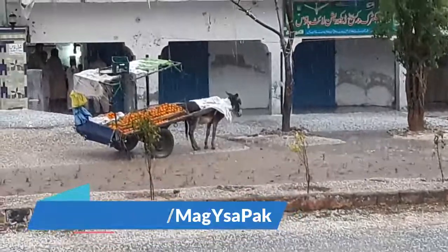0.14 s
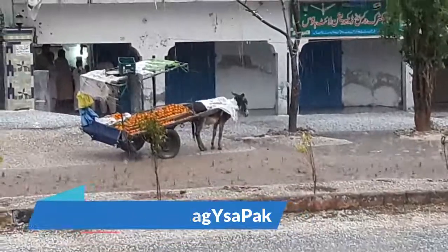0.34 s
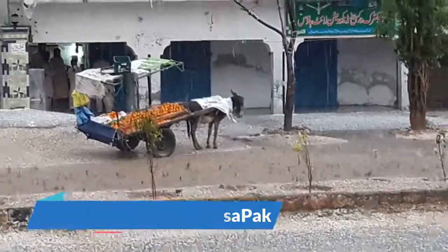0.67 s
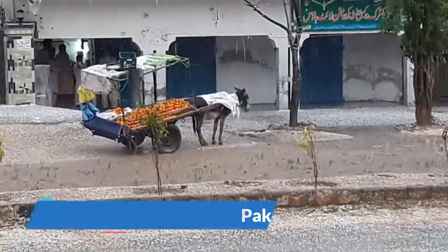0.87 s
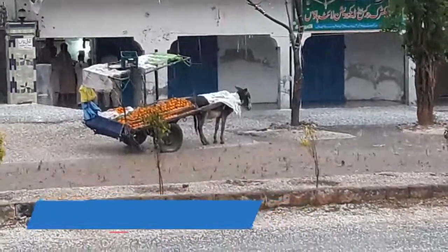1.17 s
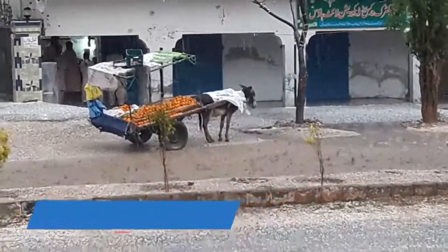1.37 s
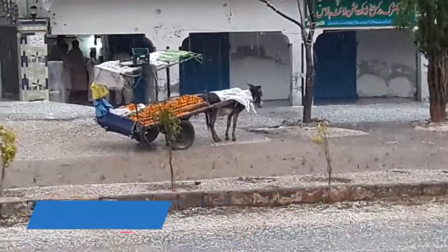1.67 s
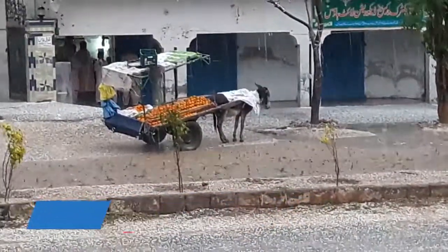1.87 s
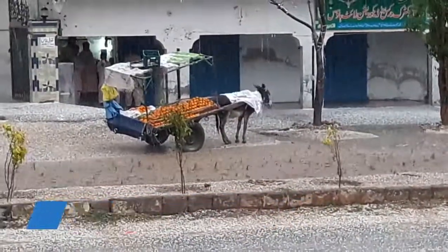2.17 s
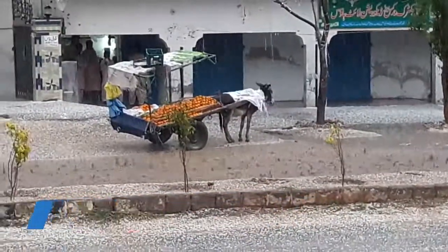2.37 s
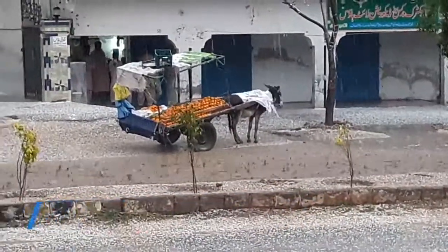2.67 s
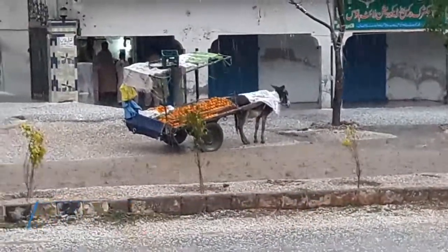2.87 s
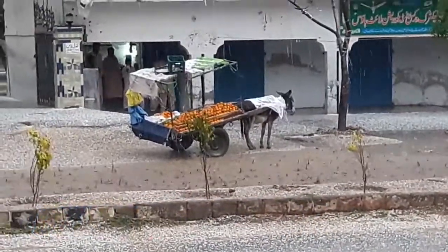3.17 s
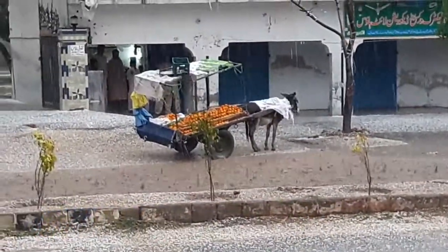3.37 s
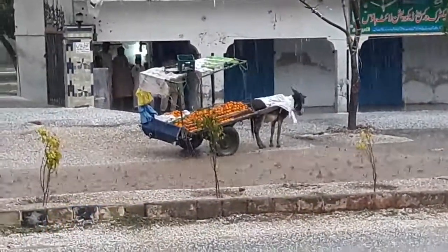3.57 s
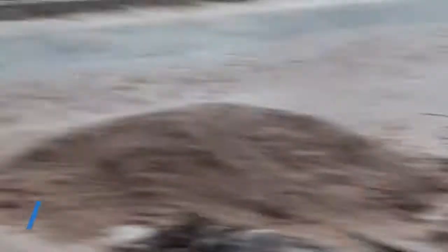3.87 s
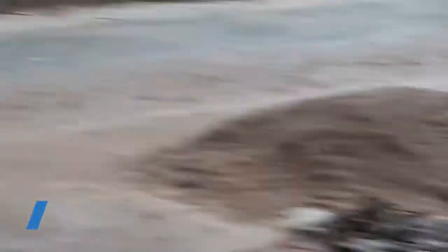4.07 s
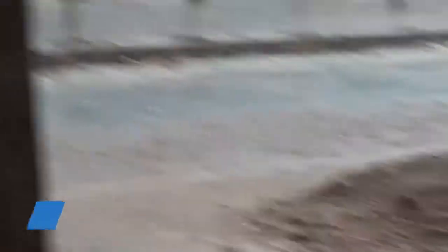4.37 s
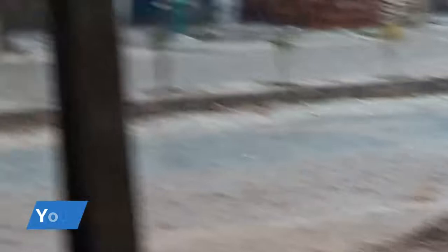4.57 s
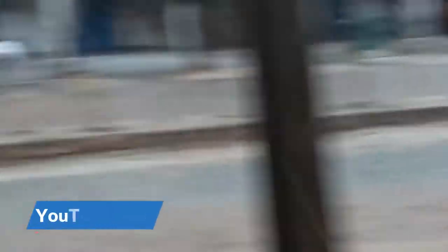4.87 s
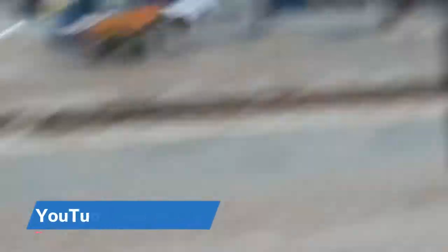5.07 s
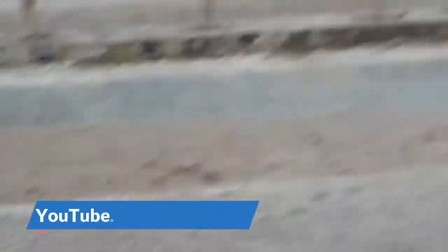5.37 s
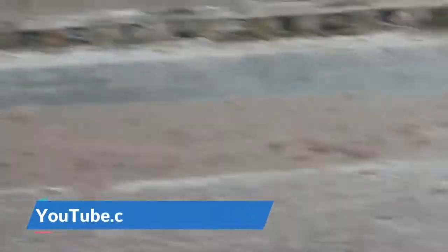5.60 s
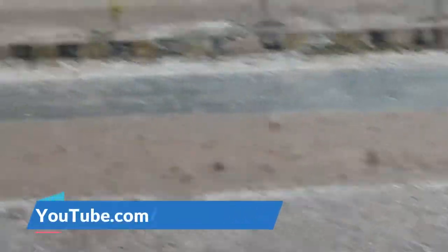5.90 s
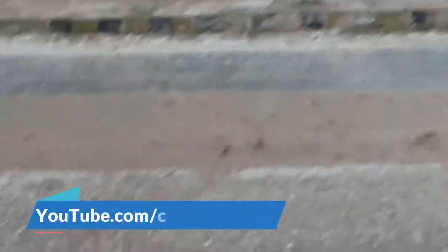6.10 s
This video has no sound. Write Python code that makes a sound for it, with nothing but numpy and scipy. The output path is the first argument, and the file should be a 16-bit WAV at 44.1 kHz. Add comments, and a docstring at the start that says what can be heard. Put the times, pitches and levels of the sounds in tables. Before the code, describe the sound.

Loud, dense rain and hail hiss on a paved street, with sharp nearby stone taps, a chugging engine and a distant horn sounding twice.

```python
"""Heavy rain and hail on a paved street, heard from a doorway by a microphone pair that turns slowly.
Rain is dense random clicks, coloured per microphone and swelling in half-octave bands; hail adds rings.
Near stones are noise bursts, some with a ringing tone; an engine (summed orders over filtered noise), a sine
hum, a two-tone horn sounding twice and a faint rising chirp lie behind.
The sound is muted for a third of a second, then fades back in."""
import sys
import numpy as np
from scipy import signal
from scipy.fft import rfft, irfft, next_fast_len
from scipy.io import wavfile

SR = 44100
rng = np.random.default_rng(int(sys.argv[2]) if len(sys.argv) > 2 else 0)


def wav_record(signal):
    """Record a signal, one row per channel, as 16-bit PCM in the file named by sys.argv[1]."""
    frames = np.transpose(np.atleast_2d(signal))
    bounded = np.clip(frames, -1, 1)
    # unit amplitude maps onto the largest positive 16-bit level
    quanta = np.round(bounded * 32767).astype(np.int16)
    wavfile.write(sys.argv[1], SR, quanta)


N = 275184
CUTOFF_HZ = 15750   # top of the rain bands and of the output


def from_db(db):
    """Amplitude gain of a level in dB."""
    return 10 ** (np.asarray(db) / 20)


def rms_one(x):
    """Signal scaled to rms 1."""
    return x / np.sqrt(np.mean(x ** 2) + 1e-20)


def in_time(rows):
    """Each column of a time table, interpolated at every sample."""
    time_s, *columns = np.transpose(rows)
    return [np.interp(np.arange(N) / SR, time_s, column) for column in columns]


def at_hz(points, hz):
    """Spectrum table interpolated on a log-frequency axis."""
    table_hz, values = np.array(points).T
    return np.interp(np.log(hz), np.log(np.maximum(table_hz, 1)), values)


def drift(rate_hz):
    """Slow noise of rms 1: double one-pole low-pass, run at every 40th sample."""
    pole = np.exp(-2 * np.pi * rate_hz * 40 / SR)
    white = rng.standard_normal(N // 40 + 2002)
    slow = signal.lfilter([1], [1, -2 * pole, pole * pole], white)[2000:]   # drop the run-in
    return np.interp(np.arange(N) / 40, np.arange(len(slow)), rms_one(slow))


def sides(pan_db):
    """Left and right gains for a left-minus-right level."""
    return from_db(np.array([pan_db / 2, -pan_db / 2]))


# faint chirp: from [s], to [s], from [Hz], to [Hz], level [dB]
CHIRP = (1.2, 1.29, 2600, 4000, -28)


def chirp():
    """Sine gliding upward with pitch jitter under a half-sine envelope."""
    start_s, end_s, start_hz, end_hz, level_db = CHIRP
    along = np.clip((np.arange(N) / SR - start_s) / (end_s - start_s), 0, 1)
    pitch_hz = (start_hz + (end_hz - start_hz) * along) * (1 + 0.0204 * drift(60.0))
    tone = np.sin(2 * np.pi * np.cumsum(pitch_hz) / SR)
    return from_db(level_db) * np.sqrt(2) * np.sin(np.pi * along) * tone


# horn blasts: (start [s], length [s], level [dB])
HONKS = [(.66, .8, -33.5), (1.708, .36, -34)]
# fundamentals of the low and high horn [Hz]
HORN_HZ = (349.0, 438.6)
# horn partials: (multiple of the fundamental, low horn level [dB], high horn level [dB])
HORN_PARTIALS = [(1, 0, -13), (2, -9, -6), (3, -4, -3), (4, -9, 2), (5, -1, -3), (6, 2, -14)]
HORN_EDGE_S = 0.052


def horn(waver_db):
    """Two harmonic tones a third apart, blurred by distance: each partial wavers on its own."""
    t = np.arange(N) / SR
    held = np.zeros(N)
    for start_s, length_s, level_db in HONKS:
        inside_s = np.minimum(t - start_s, start_s + length_s - t)
        held += from_db(level_db) * np.clip(inside_s / HORN_EDGE_S, 0, 1)
    buzz = np.zeros(N)
    for multiple, *levels_db in HORN_PARTIALS:
        for level_db, hz in zip(levels_db, HORN_HZ):
            gain = from_db(level_db + waver_db * drift(5.3))
            buzz += gain * np.sin(2 * np.pi * multiple * hz * t + rng.uniform(0, 2 * np.pi))
    return np.sqrt(2) * held * buzz


# machine hum: (time [s], level [dB])
HUM = [(0, -38), (.7, -32.5), (1.0, -30.5), (1.35, -38), (1.66, -29), (1.72, -48), (1.85, -36),
       (2.15, -39.5), (4.0, -36), (6.24, -39)]
HUM_HZ = 280.7


def hum(waver_db):
    """Sine of fixed pitch and wavering strength."""
    tone = np.sqrt(2) * np.sin(2 * np.pi * HUM_HZ * np.arange(N) / SR)
    return from_db(in_time(HUM)[0] + waver_db * drift(8.0)) * tone


# engine speed: (time [s], cycle rate [Hz])
SPEED = [(0, 9.88), (1.1, 9.89), (1.5, 9.92), (1.9, 9.96), (2.3, 9.95), (2.7, 9.87), (3.1, 9.86),
         (3.5, 9.86), (3.9, 9.835), (4.3, 9.85), (4.7, 9.91), (5.1, 9.9), (5.5, 9.925), (6.24, 9.92)]
# engine orders: (multiple of the cycle rate, relative level [dB])
ORDERS = [(5, -32), (6, -13.5), (7, -16), (8, -15.5), (9, -6), (10, -29), (11, -13.5), (12, -16.5),
          (13, -3.5), (14, -11), (15, -15.5), (16, -5.5), (17, -18.5), (18, -20.5), (19, -10.5), (20, -9),
          (21, 2), (22, -10.5), (23, -13.5), (24, -25), (25, -5.5), (26, -13.5), (27, -25.5)]
# level of tones and rumble together, louder while the microphones face the engine: (time [s], level [dB])
ENGINE = [(0, -30.5), (.25, -32), (.6, -25), (1.05, -27.5), (1.3, -28.5), (1.66, -26.5), (1.72, -38.5),
          (2.5, -36), (3.2, -35.5), (4.2, -37), (5.2, -34.5), (6.24, -35.5)]
# rumble spectrum: (frequency [Hz], relative level [dB per Hz])
RUMBLE = [(15, -43.5), (25, -22), (43, -41), (112, -7), (209, -5), (279, -6.5), (328, -10), (400, -10.5),
          (520, -11.5), (880, -120)]
STRONG_FIRING_S, RUMBLE_TO_HZ = 1.1457, 500


def engine(tones_db, rumble_db, diffuse_db, uneven_db, throb):
    """Orders of the cycle rate aligned at its strong firing, over a partly diffuse noise rumble."""
    angle = 2 * np.pi * np.cumsum(in_time(SPEED)[0]) / SR
    angle = angle - angle[round(STRONG_FIRING_S * SR)]
    load = drift(3.6)   # unevenness common to all orders
    tones = np.zeros(N)
    for order, level_db in ORDERS:
        tones += from_db(level_db + uneven_db * (load + drift(3.8))) * np.sin(order * angle)
    hz = np.maximum(np.fft.rfftfreq(N, 1 / SR), 1)
    colour = from_db(at_hz(RUMBLE, hz)) * (hz < RUMBLE_TO_HZ)
    mid, side = rms_one(irfft(rfft(rng.standard_normal((2, N))) * colour, N))
    rumble = from_db(rumble_db) * mid + from_db(diffuse_db) * side * [[1], [-1]]
    rumble = rumble * (1 + np.clip(throb, 0, 1) * np.cos(angle - 0.4))   # puffs once per cycle
    return from_db(in_time(ENGINE)[0]) * (from_db(tones_db) * rms_one(tones) + rumble)


# near stones, bright ticks: (time [s], nominal level [dB], left-right [dB])
TICKS = [(1.0285, -28, 6.5), (1.5408, -23, 8), (1.5942, -19, 7.0), (2.3021, -17, -6), (3.924, -12, 7),
         (4.132, -21, 9), (4.2906, -27, 1), (4.3988, -26, 8.5), (4.6722, -27, -14), (4.8894, -17, 14),
         (5.8874, -28, 11), (5.9972, -36, 5)]
# near stones, duller taps: (time [s], nominal level [dB], left-right [dB], ring frequency [Hz])
TAPS = [(1.542, -12, -3.5, 2960), (2.5444, -9, -4.0, 3250), (3.1, -4.5, -8, 4020), (4.1659, -6, 0, 3300),
        (4.6025, -6, -1, 3030), (5.034, -1.5, -1.5, 3200), (5.135, -9, -0.5, 3260),
        (5.3394, -4, -2.5, 3400), (5.6544, -6, -3.5, 3550)]


def hailstones():
    """Ticks: click in a bright noise burst; taps: narrow noise burst plus the ring of the struck object."""
    length = 2000
    out, t = np.zeros((2, N + length)), np.arange(length) / SR
    bright = signal.butter(1, [6000, 13500], "band", fs=SR, output="sos")
    contact = 3.4 * (np.arange(length) == 75)
    for time_s, level_db, pan_db in TICKS:
        splash = .35 * rng.standard_normal((2, length)) * from_db(-60 * t / .025)
        burst = signal.sosfilt(bright, contact + splash)
        start = round(time_s * SR)
        out[:, start:start + length] += from_db(level_db) * sides(pan_db)[:, None] * burst
    for time_s, level_db, pan_db, hz in TAPS:
        body = signal.butter(1, [hz * 1.06, hz * 1.07], "band", fs=SR, output="sos")
        burst = signal.sosfilt(body, rng.standard_normal(length) * from_db(-60 * t / 0.038))
        ring = 0.2 * np.sin(2 * np.pi * hz * t) * from_db(-60 * t / 0.085)
        start = round(time_s * SR)
        out[:, start:start + length] += from_db(level_db) * sides(pan_db)[:, None] * (1.2 * burst + ring)
    return out[:, :N]


# downpour strength, nominal roar level, also sets the patter: (time [s], level [dB])
DOWNPOUR = [(0, -16), (.25, -17), (.6, -12), (.79, -14), (.85, -14), (1.24, -14.5), (1.36, -13.5),
            (2.22, -13), (2.26, -13), (2.3, -13), (2.6, -12.5), (2.7, -15), (3.1, -13.5), (3.13, -16),
            (3.25, -15), (3.31, -13), (3.37, -13.5), (4.02, -14), (4.08, -13.5), (4.13, -13.5), (5.8, -13),
            (6.24, -13)]
# rain spectrum at each microphone, also colours the patter: (frequency [Hz], relative level [dB per Hz])
LEFT_RAIN = [(330, -15), (560, -16.5), (850, -4), (1050, -2.5), (1350, -5.5), (1750, 1), (2150, -6),
             (2500, -6.5), (2950, -12), (6800, -23.5), (8300, -21.5), (8900, -29.5), (11500, -29.5),
             (15000, -38.5)]
RIGHT_RAIN = [(330, -16), (560, -14), (850, -3), (1050, -2), (1350, -5.5), (1750, 1), (2150, -6),
              (2500, -5.5), (2950, -9), (4100, -11.5), (6800, -20), (8300, -28.5), (8900, -33.5),
              (15000, -40)]


def patter(per_s, cycles, patter_db):
    """Hailstones of random size and place ring one of 24 resonators, falling 60 dB in the given cycles."""
    sizes = from_db(4.0 * np.minimum(rng.exponential(1, N), 4)) * rng.choice([-1, 1], N)
    sizes = sizes * (rng.random(N) < per_s / SR)
    left_share, dealt = rng.random(N), rng.integers(0, 24, N)
    stones = sizes * np.sqrt([left_share, 1 - left_share])
    out = np.zeros((2, N))
    for k, hz in enumerate(np.geomspace(700, 6000, 24)):
        pole, w = from_db(-60 * hz / (cycles * SR)), 2 * np.pi * hz / SR
        struck = stones * (dealt == k) + 1e-18
        rings = signal.lfilter([0, np.sin(w)], [1, -2 * pole * np.cos(w), pole * pole], struck)
        colour = from_db([[at_hz(LEFT_RAIN, hz)], [at_hz(RIGHT_RAIN, hz)]])
        out += rings * np.sqrt(hz / 1000) * colour
    return from_db(in_time(DOWNPOUR)[0] + patter_db) * rms_one(out)


def impacts(per_s, spread_db, far_share):
    """Two streams of random clicks of uneven size over the smooth noise of distant ones."""
    sizes = from_db(spread_db * np.minimum(rng.exponential(1, (2, N)), 5)) * rng.choice([-1, 1], (2, N))
    near = rms_one(sizes * (rng.random((2, N)) < per_s / SR))
    far_share = np.clip(far_share, 0, 1)
    return np.sqrt(far_share) * rng.standard_normal((2, N)) + np.sqrt(1 - far_share) * near


# stereo coherence: (frequency [Hz], left-right likeness [-1 to 1])
LIKENESS = [(60, 0.91), (110, 0.92), (200, 0.99), (380, 0.58), (700, 0.78), (1290, 0.25), (2380, 0.5),
            (4400, 0.43), (8120, -0.12), (15000, -0.17)]
# resonances of the recess: (frequency [Hz], width [Hz], boost [dB])
DOORWAY = [(1070, 160, 1), (1820, 790, -0.5), (2410, 220, 1.5)]
# treble against its usual: (time [s], level [dB])
TREBLE = [(0, 7.5), (.25, 6), (.6, 0), (.76, -2), (2.2, -2.5), (2.5, -1), (3.05, 0.5), (3.35, 2.5),
          (3.7, 0.7), (4.3, 1.5), (5.0, 0.7), (5.6, -1.7), (5.95, 0.5), (6.1, -1), (6.24, -2)]
# turn of the microphones: (time [s], treble left-right [dB], roar left-right [dB])
TURN = [(0, 0.5, .1), (.25, .1, .1), (.6, 0.5, 0.5), (2.1, -0.5, 1.2), (2.7, -1, 0.5), (2.95, -.5, -2),
        (3.4, 1.7, -0.2), (4.3, 1.5, -0.3), (5.2, 1.8, -.1), (6.24, 2.3, -0.5)]
# splash sizzle, droplet hiss, fine spray: (from [Hz], usual level [dB],
# share of downpour swing [ratio], share of treble swing [ratio], share of turn [ratio])
ZONES = [(2747, -24, 1, .25, 0.26), (4930, -32.5, 0.36, 0.68, 1.8), (8550, -41.5, .3, 0.77, 0.53)]
LEFT_LEAD_S, ROAR_FROM_HZ = .00006, 600
LOW_ROAR_TO_HZ, LOW_ROAR_TREBLE_SHARE = 750, .35


def rain(gust_db, flicker_db, treble_flicker_db, sway_db):
    """Impacts coloured per microphone, in overlapping half-octave bands that swell partly together."""
    size = next_fast_len(N)
    hz = np.maximum(np.fft.rfftfreq(size, 1 / SR), 1)
    common, apart = rfft(impacts(per_s=2500, spread_db=4.0, far_share=0.82), size)
    alike = np.clip(at_hz(LIKENESS, hz), -1, 1)
    left = np.sqrt(1 + alike) * common + np.sqrt(1 - alike) * apart
    left = left * np.exp(2j * np.pi * hz * LEFT_LEAD_S)
    right = np.sqrt(1 + alike) * common - np.sqrt(1 - alike) * apart
    thin = hz ** 2 / (hz ** 2 + 183.0 ** 2)   # small impacts radiate little bass
    recess_db = sum(db / (1 + (2 * (hz - top_hz) / width_hz) ** 2) for top_hz, width_hz, db in DOORWAY)
    pair = np.array([left * from_db(at_hz(LEFT_RAIN, hz)), right * from_db(at_hz(RIGHT_RAIN, hz))])
    pair = pair * thin * from_db(recess_db)

    (roar,), (treble,), (turn, roar_turn) = in_time(DOWNPOUR), in_time(TREBLE), in_time(TURN)
    edges_hz = [ROAR_FROM_HZ] + [zone[0] for zone in ZONES] + [CUTOFF_HZ]
    levels_db, leans_db = [roar], [roar_turn]
    for _, usual_db, pour_share, treble_share, turn_share in ZONES:
        levels_db.append(usual_db + pour_share * (roar - roar.mean()) + treble_share * treble)
        leans_db.append(turn_share * turn)
    gains = []
    for level_db, lean_db, low_hz, high_hz in zip(levels_db, leans_db, edges_hz, edges_hz[1:]):
        in_zone = irfft(pair.mean(axis=0) * (hz > low_hz) * (hz < high_hz), size)
        zone_rms = np.sqrt(np.mean(in_zone ** 2))
        gains.append(from_db(level_db) / zone_rms * sides(lean_db + sway_db * drift(3.7)))

    out, neighbour, gust = np.zeros((2, N)), drift(6.0), drift(10.7)
    for step in range(-12, 10):
        centre_hz = 1000 * 2 ** (step / 2)
        window = np.clip(1 - 2 * np.abs(np.log2(hz / centre_hz)), 0, 1)
        band = irfft(pair * window, size)[:, :N]
        zone = sum(centre_hz > row[0] for row in ZONES)   # 0 is the roar
        shared = drift(10.2)   # shared with the next band up
        band_flicker_db = treble_flicker_db if zone else flicker_db
        swing_db = gust_db * gust + band_flicker_db * (neighbour + shared + 1.65 * drift(36.0))
        if centre_hz < LOW_ROAR_TO_HZ:
            swing_db = swing_db + LOW_ROAR_TREBLE_SHARE * treble
        out += band * gains[zone] * from_db(swing_db)
        neighbour = shared
    return out


def scene():
    """Rain and hail in stereo, chirp centred, machines and horn slightly right."""
    machines = engine(tones_db=-1.5, rumble_db=-1.5, diffuse_db=-13.0, uneven_db=1.4, throb=0.25)
    machines = machines + hum(waver_db=2.0) + horn(waver_db=1.5)
    downpour = rain(gust_db=0.74, flicker_db=.5, treble_flicker_db=0.5, sway_db=0.5)
    downpour = downpour + patter(per_s=400.0, cycles=69.0, patter_db=-11.0)
    return downpour + hailstones() + chirp() + sides(-1.7)[:, None] * machines


MUTE_S, UNMUTE_S, FADE_IN_S = .249, .592, 0.19


def record(dry):
    """Deep-bass cut, hard clipping, a mute with a quick fade back, then a steep top cut."""
    t = np.arange(N) / SR
    before = np.clip((MUTE_S - t) / .001, 0, 1)
    after = np.clip((t - UNMUTE_S) / FADE_IN_S + 0.054, 0, 1) * (t > UNMUTE_S)
    # small capsules lose the deep bass
    dry = signal.sosfilt(signal.butter(2, 40, "high", fs=SR, output="sos"), dry)
    clipped = np.clip(dry, -.97, .97)
    top_cut = signal.ellip(12, .3, 75, CUTOFF_HZ, fs=SR, output="sos")
    return signal.sosfilt(top_cut, (before + after) * clipped)


dry = scene()
out = record(dry)
wav_record(out)
```